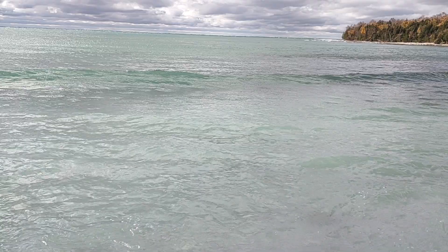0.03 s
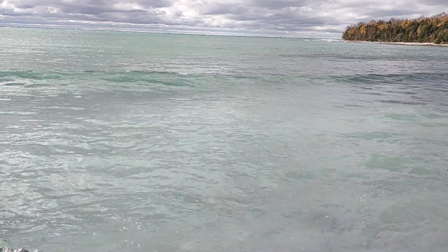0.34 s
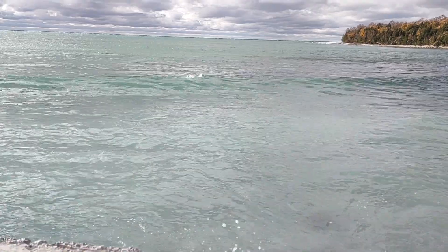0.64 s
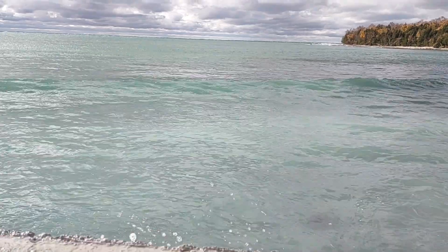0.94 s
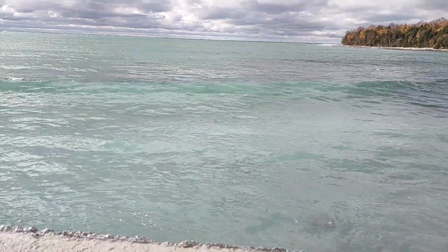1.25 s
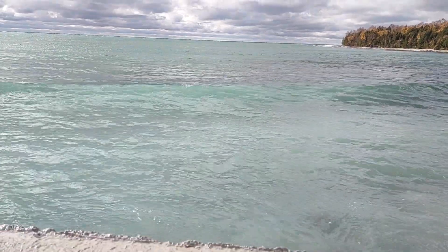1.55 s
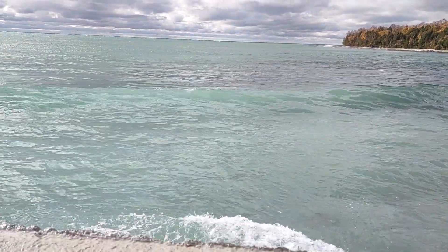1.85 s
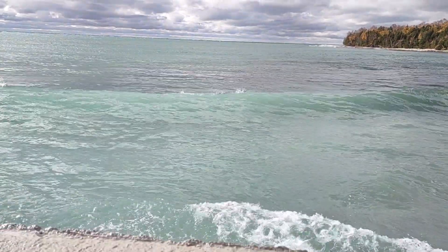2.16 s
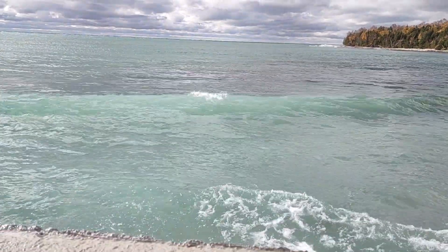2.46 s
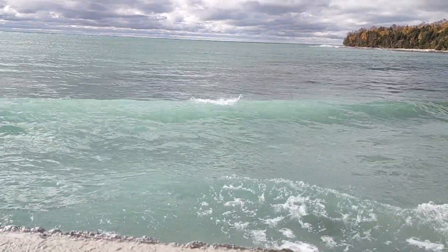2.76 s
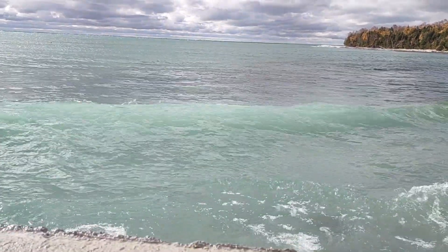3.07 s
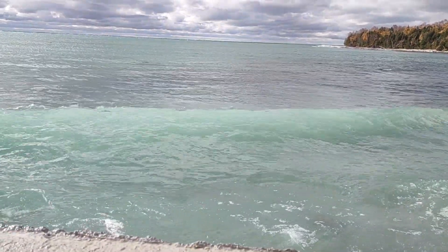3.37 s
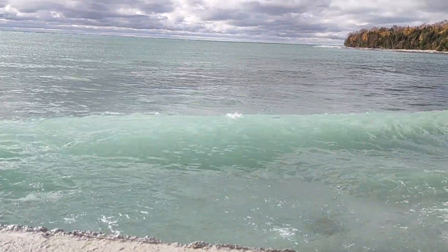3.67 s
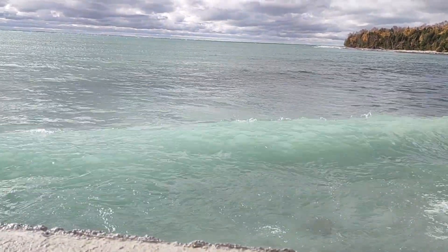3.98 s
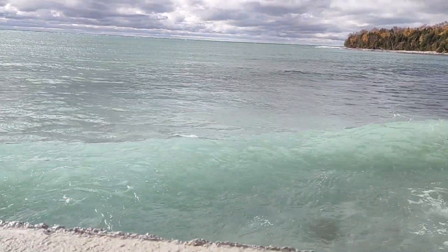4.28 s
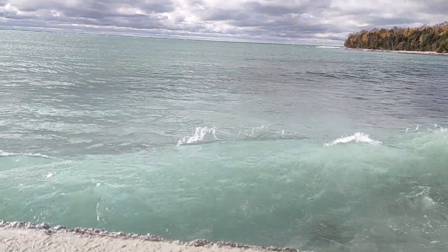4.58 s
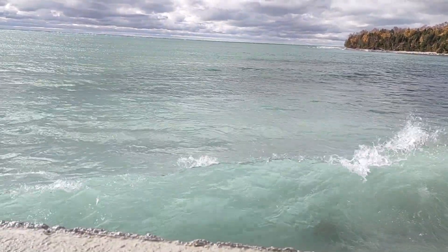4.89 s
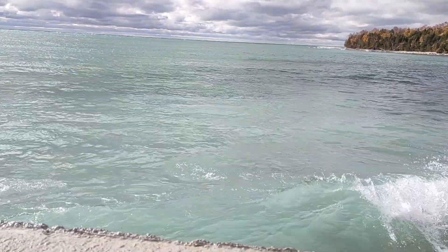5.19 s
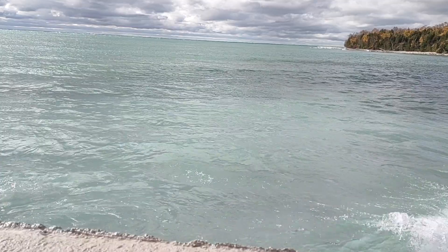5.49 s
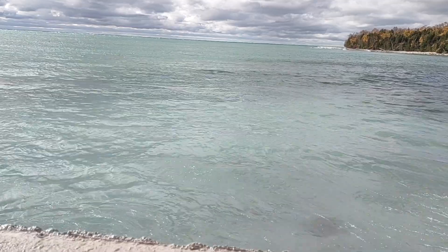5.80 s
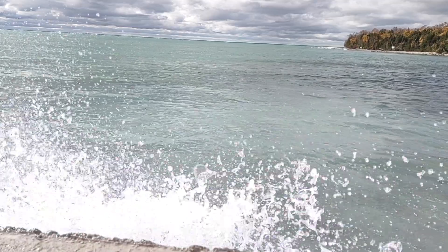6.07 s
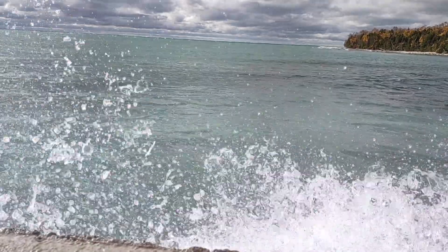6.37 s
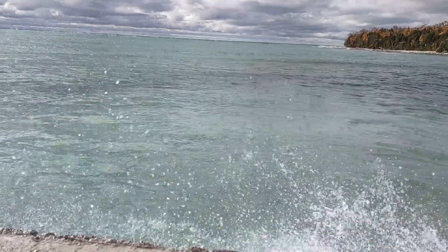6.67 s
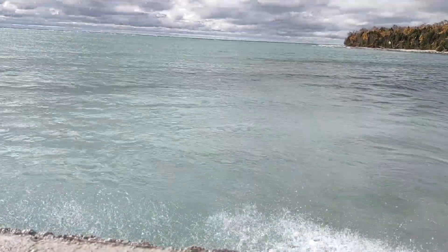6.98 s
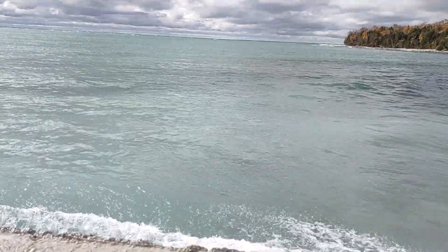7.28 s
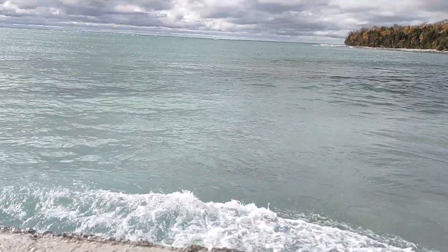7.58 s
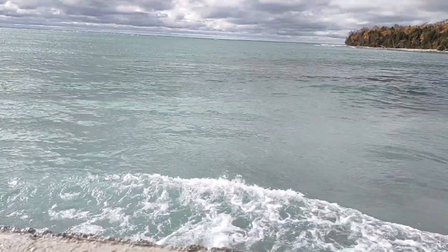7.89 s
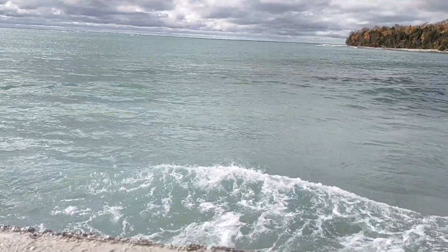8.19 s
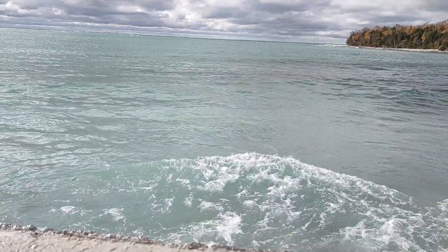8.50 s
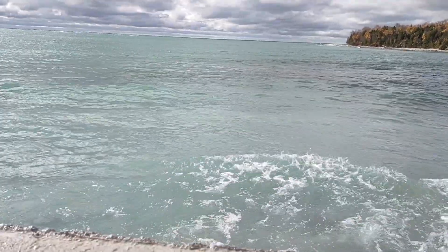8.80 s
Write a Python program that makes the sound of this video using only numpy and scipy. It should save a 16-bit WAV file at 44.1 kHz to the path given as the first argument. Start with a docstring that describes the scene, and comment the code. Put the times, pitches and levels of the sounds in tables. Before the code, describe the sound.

Outdoors at a lakeside wall, close water washes up with soft thumps and a foamy backwash. Uneven gusts rumble and flutter on both sides of the hand-held microphone, strongest around the middle. The next wave builds, thuds into the concrete and breaks loudly, throwing up hissing spray. Afterwards the foam fizzes away, leaving lapping water and the softer rush of a more distant wave.

```python
"""Lake swells run against a concrete edge: one washes up and drains back, the next curls and bursts.
Entrained air resonates, so the water roars, gurgles and thuds; the backwash rushes, foam fizzes,
spray sizzles and drops patter down, while surf churns further along the shore.
The water is heard through the two spaced, resonant ports of a hand-held microphone.
Turbulent gusts buffet each port on its own, with a low rumble and flutter."""
import sys
import numpy as np
from scipy import signal
from scipy.fft import rfft, irfft, next_fast_len
from scipy.io import wavfile
from scipy.ndimage import uniform_filter1d

SR = 44100
rng = np.random.default_rng(int(sys.argv[2]) if len(sys.argv) > 2 else 0)


def generate_wav(signal):
    """Clip the signal to [-1, 1] and save it as 16-bit WAV at the path in sys.argv[1]."""
    frames = np.transpose(np.atleast_2d(signal))
    scaled = np.clip(frames, -1, 1) * 32767
    pcm = np.round(scaled).astype(np.int16)
    wavfile.write(sys.argv[1], SR, pcm)


N = 399105
TIME = np.arange(N) / SR
FFT_SIZE = next_fast_len(N, True)
HZ = np.maximum(np.arange(FFT_SIZE // 2 + 1) * SR / FFT_SIZE, 1)

# Spectra of the water: f/Hz, relative spectral level/dB
ROAR_SPECTRUM = [(40, -50), (90, 1.5), (170, 2.5), (240, 2), (310, 3), (450, 4), (650, -0.5), (850, -9.5),
                 (1050, -8.5), (1400, -15), (1800, -8.5), (2200, -16), (2600, -10.5), (6000, -43)]  # clouds of trapped air
WASH_SPECTRUM = [(300, -7.5), (700, 5), (1050, -8), (1400, 2.5), (1650, 0), (1950, 1), (2280, 0.5),
                 (2550, -10), (2850, -8), (3200, -18), (6000, -36.5), (9000, -49.5), (16000, -56)]  # the running sheet of water
FOAM_SPECTRUM = [(700, -26.5), (1500, -11.5), (2500, -5.5), (3500, 2), (5500, -4), (7000, -9.5),
                 (9000, -25.5), (16000, -54)]
SPRAY_SPECTRUM = [(900, -15), (2000, -15), (5000, 0), (7000, -1), (9600, -4), (11800, -11), (16000, -10)]
SURF_SPECTRUM = [(150, -48), (420, 9), (650, 8), (950, 0.5), (1150, 4), (1450, -15), (3000, -45)]  # churning further along the shore
MIST_SPECTRUM = [(5000, -29), (8000, 4), (11000, -1), (13500, 5), (16000, 0)]  # the finest spray
CAVITY_SPECTRUM = [(150, -2), (240, 12.5), (340, -5.5), (750, -30), (980, -0.5), (1150, -15), (1330, -7),
                   (1770, -5), (2100, -20), (2420, -3.5), (2580, -10), (2780, -5.5), (3300, -50),
                   (6000, -36)]  # the air pocket under the curling crest
SPILL_SPECTRUM = [(300, -10), (700, -5.5), (1000, -12), (1380, 9), (1650, 1), (1900, 1), (2300, -4.5),
                  (2550, -11.5), (3020, -13.5), (3300, -27), (6000, -30), (9000, -45), (16000, -62)]  # the distant spilling crest
# Lapping between surges: t/s, wash/dB, foam/dB, spray/dB, left minus right/dB
LAPPING_LEVELS = [(0, -42, -47, -56, -2), (2.7, -39.5, -93, -60, -0.5), (3.4, -37, -60, -59.5, 1.5),
                  (3.9, -39, -61, -63, -0.5), (4.45, -39.5, -58, -61, -1.5), (5.3, -58, -61, -56, 3),
                  (7.7, -46, -55, -58.5, -0.5), (9.05, -54, -68, -72, -15)]
# Surges at the wall; four rows for the first swell, six for the one that breaks: start/s, rise/s, hold/s,
# foam decay/(dB/s), roar/dB, wash/dB, foam/dB, spray/dB, left minus right/dB
WALL_SURGES = [(0.225, 0.22, .33, 16, -25, -31, -37.5, -54, 1.5),
               (0.797, 0.1, 0.49, 23.5, -27, -27.5, -33.5, -52, 1.5),
               (1.0, 0.19, .02, 19, -43, -31.5, -50, -41, -2),
               (1.513, 0.23, 0.21, 20, -28, -34, -38, -76, 1),
               (4.491, 0.11, 0.059, 58.5, -31, -38.5, -51, -62, -2),
               (4.618, 0.14, 0.26, 30, -31.5, -54, -43, -51.5, -6.5),
               (4.94, 0.42, 0.64, 25.5, -29, -67, -34, -33, -5.5),
               (5.817, 0.49, 0.14, 32.5, -20.5, -29.5, -30, -30, 0.7),
               (6.476, .27, 0.16, 55, -22, -36, -29.5, -30, -1.5),
               (6.85, 0.14, 0.087, 48, -55.5, -57, -33, -34, -4)]
# Churning of the distant surf: t/s, level/dB
SURF_LEVELS = [(0, -66), (4.5, -44), (5.3, -38), (6.3, -26), (7.1, -30.5), (7.8, -38), (9.05, -39)]
# Gusts: start/s, rise/s, hold/s, left port/dB, right port/dB, extra small eddies/dB
WIND_GUSTS = [(.4, 0.12, 0.25, -33, -35, 2), (1.497, 0.76, 0.085, -38.5, -29, -12),
              (2.496, 0.1189, .45, -29, -29, -3), (3.15, .42, .13, -27, -19, 2.5),
              (3.72, .42, 0.34, -15, -18.5, 2.5), (4.999, 0.121, .2, -22.5, -24, 2),
              (5.501, .1, .1, -26, -27, 0.5), (5.75, .5, .1, -22, -23, -1),
              (6.621, .12, 0.092, -18, -23, -1.5), (7.099, .08, .3, -26, -32, -3.5),
              (7.599, 0.18, .25, -38, -45, -6)]
# Spectra of large and small eddies: f/Hz, relative spectral level/dB
RUMBLE_SPECTRUM = [(40, -12), (65, -8.5), (105, 3), (170, -3.5), (260, -19), (400, -24), (800, -63),
                   (2000, -76)]
FLUTTER_SPECTRUM = [(100, -8.5), (170, -1), (250, 4), (350, -6.5), (450, -14.5), (800, -27), (1400, -52),
                    (3000, -79)]
# Air pockets pinched off against the wall: t/s, level/dB, f/Hz
WALL_SLAPS = [(0.338, -17, 205), (0.481, -16, 116), (0.746, -11, 165), (.836, -20, 122),
              (5.844, -11.5, 184), (6.106, -10.5, 150), (6.298, -9, 138.8)]
# Finest spray thrown up close by: start/s, rise/s, hold/s, decay/(dB/s), level/dB
MIST_BURSTS = [(1.1, .13, .02, 104, -53), (6.043, .26, 0.14, 30, -35.5), (6.6, .25, 0.21, 188, -40.5)]
# Single eddies striking a port: t/s, duration/s, level/dB, port (0 left, 1 right), speed/usual speed
EDDY_STRIKES = [(2.19, 0.034, -19.5, 1, .85), (2.28, 0.026, -23.5, 1, .9), (2.617, .028, -7.5, 1, 1.15),
                (2.744, 0.057, -19, 0, .95), (2.807, 0.02, -15.5, 0, .95), (2.916, 0.044, -19.5, 1, .8),
                (3.105, 0.022, -23.5, 0, .9), (3.268, 0.018, -14.5, 1, 1), (3.38, 0.048, -15, 1, 1.25),
                (3.59, 0.086, -12, 0, 1.3), (3.718, 0.063, -19, 0, 1.1), (3.884, .03, -13, 1, 1),
                (3.979, 0.027, -12, 1, 1.1), (4.366, 0.091, -11, 0, 1.1), (4.435, 0.052, -9.5, 1, 1.2),
                (4.629, 0.18, -16, 1, 1.3), (4.636, 0.096, -11, 0, 1.5), (4.689, 0.0484, -8.5, 0, 2),
                (4.91, 0.092, -10.5, 0, 1.1), (5.033, 0.056, -11.5, 0, 1.1), (5.115, 0.063, -14.5, 0, 1.3),
                (5.477, .08, -7.5, 0, 1.8), (5.597, 0.064, -15, 0, 1.2), (5.855, 0.043, -17.5, 1, 1.4),
                (6.691, 0.034, -15, 1, .9), (6.798, 0.066, -11, 0, .9), (6.847, 0.031, -12.5, 0, .9),
                (6.899, 0.069, -12, 0, 1), (7.047, 0.025, -16.5, 1, .9), (7.159, .037, -17, 0, .9),
                (7.22, .04, -20.5, 0, .9), (7.263, .035, -12.5, 1, 1), (7.284, 0.0185, -8, 1, 1.4),
                (7.498, 0.038, -17, 0, 1), (7.535, .028, -20.5, 1, 1), (7.836, 0.034, -29.5, 0, .9),
                (7.895, 0.035, -30.5, 1, .9), (8.63, 0.081, -28.5, 1, .9)]
# Drops landing close by: t/s, level/dB, left minus right/dB, f/Hz
DROP_IMPACTS = [(2.551,-57,-4,4995), (3.807,-61.5,-6,5520), (4.108,-54,-5,5430), (4.133,-47,-4,5930),
                (4.313,-44,-6,2964), (4.434,-43,-5,5320), (4.589,-38.5,-3.5,5020), (4.833,-39.5,-13,4150),
                (5.309,-26.5,-9,5480), (7.579,-51,-4,13960), (7.749,-45,0,4227)]
# Shore sound across the two ports: f/Hz, coherence (0 to 1), phase lead of the right port/rad
PORT_COHERENCE = [(198, 0.99, .05), (435, 0.78, 0.79), (696, 0.82, 1.14), (863, 0.58, 3.25),
                  (1420, 0.65, 3.1), (1654, 0.32, 3.6), (2030, 0.37, 7.5), (2326, 0.42, 5.8),
                  (3080, 0, 13.4), (3670, 0.13, 12.2), (5400, 0, 16.8)]
# Resonances of the ports: f/Hz, left gain/dB, right gain/dB
PORT_RESPONSE = [(203, 1.5, 1), (530, -4, -3.5), (1100, 3.5, 3), (1310, -1, -2), (1970, -0.5, -2),
                 (2390, 1, -1.5), (3040, -6.5, 4.5), (4110, 1, 5.5), (5740, -1, 9), (6980, -1.5, -2),
                 (9050, -8.5, -1.5), (11500, -2.5, -2), (15500, -1.5, 0)]


def from_db(db):
    """Amplitude ratio of a level in decibels."""
    return np.exp(np.asarray(db) * (np.log(10) / 20))


def unit_rms(x):
    """Normalisation to unit mean square."""
    return x / np.sqrt(np.mean(x ** 2) + 1e-20)


def over_time(rows):
    """Linear interpolation of each column to every sample."""
    times, *columns = np.transpose(rows)
    return [np.interp(TIME, times, column) for column in columns]


def over_frequency(rows):
    """Interpolation of each column to every frequency, on an octave scale."""
    hz, *columns = np.transpose(rows)
    return np.array([np.interp(np.log2(HZ), np.log2(hz), column) for column in columns])


def filtered(x, response):
    """Linear filtering: the spectrum is multiplied by a response tabulated in decibels."""
    return irfft(rfft(x, FFT_SIZE) * from_db(over_frequency(response)), FFT_SIZE)[:, :N]


def panned(pan_db):
    """Left and right gains: a level difference gives direction."""
    return from_db(np.array([[.5], [-.5]]) * pan_db)


def drift(rate_hz):
    """Slow random modulation: low-passed noise of unit spread."""
    step, settling = 40, 2000
    pole = np.exp(-2 * np.pi * rate_hz * step / SR)
    noise = rng.standard_normal(N // step + settling + 2)
    slow = signal.lfilter([1], [1, -2 * pole, pole * pole], noise)[settling:]
    return np.interp(np.arange(N) / step, np.arange(len(slow)), unit_rms(slow))


def envelope(start_s, rise_s, hold_s, fall_db_per_s):
    """One push of water or air: linear growth, a plateau, then exponential decay."""
    age = TIME - start_s
    dying_s = np.maximum(age - rise_s - hold_s, 0)
    return np.clip(age / rise_s, 0, 1) * from_db(-fall_db_per_s * dying_s)


def pops(per_s, spread_db):
    """A Poisson process: impulses of random size, each with its own strength in either channel."""
    chance, size, left, right = rng.random((4, N), dtype=np.float32)
    born, out = chance < per_s / SR, np.zeros((2, N), np.float32)
    height = from_db(-spread_db * np.log(size[born] + .01))
    out[:, born] = height * (np.array([left[born], right[born]]) - .5)
    return out


def water_noise(spectrum, per_s, spread_db, waver_db, waver_hz):
    """Shot noise: a wavering crowd of tiny bursts, partly coherent between the spaced ports."""
    coherence, lead = over_frequency(PORT_COHERENCE).astype(np.float32)
    coherence = np.clip(coherence, 0, 1)
    left, independent = rfft(pops(per_s, spread_db), FFT_SIZE)
    right = coherence * np.exp(1j * lead) * left + np.sqrt(1 - coherence ** 2) * independent
    colour = from_db(over_frequency(spectrum)).astype(np.float32)
    crowd = irfft(np.array([left, right]) * colour, FFT_SIZE)[:, :N]
    return unit_rms(crowd * from_db(waver_db * drift(waver_hz)))


def bubbles(low_hz, high_hz, cycles, glide, spread_db, count):
    """Bubble resonance: each rings down and climbs in pitch near the surface; the far port lags."""
    out, port_lag = np.zeros((2, N + SR)), SR // 2000
    for when, size, strength, side in rng.random((count, 4)):
        hz = low_hz * (high_hz / low_hz) ** size
        start, near = int(when * N), int(side > .5)
        life = cycles / hz
        age = TIME[:int(life * SR)]
        height = from_db(-spread_db * np.log(strength + .01) - 60 * age / life)
        ring = height * np.sin(2 * np.pi * hz * age * (1 + glide * age / life))
        out[near, start:start + len(age)] += ring
        out[1 - near, start + port_lag:start + port_lag + len(age)] += ring
    return unit_rms(out[:, :N])


def surge_gains(lapping_roar_db=-39.5):
    """Incoherent sources add in power: each surge joins the lapping in roar, wash, foam and spray."""
    *lapping_db, lapping_pan_db = over_time(LAPPING_LEVELS)
    wash, foam, spray = ((panned(lapping_pan_db) * from_db(db)) ** 2 for db in lapping_db)
    roar = from_db(lapping_roar_db) ** 2
    for start, rise, hold, fall, roar_db, wash_db, foam_db, spray_db, pan_db in WALL_SURGES:
        side = panned(pan_db)
        # roar and wash outlast the foam; spray dies soonest
        roar += (from_db(roar_db) * envelope(start, rise, hold, fall * .6)) ** 2
        wash += (side * from_db(wash_db) * envelope(start, rise, hold, fall * .6)) ** 2
        foam += (side * from_db(foam_db) * envelope(start, rise, hold, fall)) ** 2
        spray += (side * from_db(spray_db) * envelope(start, rise, hold, fall * 1.74)) ** 2
    return [np.sqrt(power) for power in (roar, wash, foam, spray)]


def waves(bubble_db=-14):
    """Air entrainment: bubble clouds roar, the wash rushes, foam and spray crackle, lone bubbles ring."""
    roar_gain, wash_gain, foam_gain, spray_gain = surge_gains()
    roar = water_noise(ROAR_SPECTRUM, per_s=7000, spread_db=2, waver_db=1.45, waver_hz=6.1)
    wash = water_noise(WASH_SPECTRUM, per_s=9000, spread_db=2, waver_db=.78, waver_hz=9.6)
    foam = water_noise(FOAM_SPECTRUM, per_s=20000, spread_db=2, waver_db=1.05, waver_hz=10.5)
    spray = water_noise(SPRAY_SPECTRUM, per_s=18000, spread_db=1, waver_db=.8, waver_hz=29)
    gurgle = from_db(bubble_db) * bubbles(260, 900, cycles=32, glide=.15, spread_db=3, count=600)
    trickle = from_db(bubble_db) * bubbles(900, 2600, cycles=36, glide=.15, spread_db=3.5, count=1500)
    fizz = from_db(bubble_db) * bubbles(2600, 6500, cycles=40, glide=.08, spread_db=4, count=2000)
    return (roar_gain * (roar + gurgle) + wash_gain * (wash + trickle)
            + foam_gain * (foam + fizz) + spray_gain * spray)


def far_surf(gulps_db=-9):
    """Water churning along the shore: shot noise, with the gulps of resonating bubbles."""
    surf_db, = over_time(SURF_LEVELS)
    churn = water_noise(SURF_SPECTRUM, per_s=6000, spread_db=2, waver_db=1.5, waver_hz=17)
    gulps = from_db(gulps_db) * bubbles(350, 1000, cycles=45, glide=.1, spread_db=3.5, count=220)
    return from_db(surf_db) * (churn + gulps)


def gusts(breeze_db=-49, fall_db_per_s=75):
    """Gusts add in power to a breeze, giving the pressure of large and small eddies at each port."""
    large = small = from_db(breeze_db) ** 2
    for start, rise, hold, left_db, right_db, small_db in WIND_GUSTS:
        gust = from_db([[left_db], [right_db]]) * envelope(start, rise, hold, fall_db_per_s)
        large = large + gust ** 2
        small = small + (gust * from_db(small_db)) ** 2
    return np.sqrt([large, small])


def eddies(spectrum, speed, steadiness):
    """Frozen turbulence: a fixed pattern is carried past each port, so frequency scales with speed."""
    swirl = unit_rms(filtered(rng.standard_normal((2, N)), spectrum))
    local_power = uniform_filter1d(swirl ** 2, size=1200, axis=1)
    swirl = unit_rms(swirl / (local_power + 1e-9) ** (steadiness / 2))
    travelled = np.cumsum(speed, axis=1) % (N - 1)
    return np.array([np.interp(path, np.arange(N), port) for path, port in zip(travelled, swirl)])


def wind(flutter_db=-9, flutter_exponent=1.006, usual_db=-20, speed_exponent=.14):
    """Turbulent pressure on the ports rumbles and flutters; stronger flow is faster, hence brighter."""
    waver_db = .9 * np.array([drift(18), drift(18)])
    flow, small_eddies = gusts() * from_db(waver_db)
    blows, blow_speed = buffets()
    pressure = np.hypot(flow, blows)
    flow_speed = np.maximum(flow / from_db(usual_db), .2) ** speed_exponent
    speed = (flow_speed * flow ** 2 + blow_speed * blows ** 2) / pressure ** 2  # power-weighted mean
    rumble = pressure * eddies(RUMBLE_SPECTRUM, speed, steadiness=.55)
    flutter_gain = from_db(flutter_db) * np.hypot(small_eddies, blows) ** flutter_exponent
    return rumble + flutter_gain * eddies(FLUTTER_SPECTRUM, speed, steadiness=.45)


def slaps(t60_s=.066, rise_s=.0014):
    """Damped oscillation of air squeezed against the wall: a dull thud, alike at both ports."""
    out, age = np.zeros(N), TIME[:SR // 4]
    for onset_s, level_db, hz in WALL_SLAPS:
        start = int(onset_s * SR)
        height = from_db(level_db - 60 * age / t60_s) * (1 - np.exp(-age / rise_s))
        out[start:start + len(age)] += height * np.sin(2 * np.pi * (hz * age + rng.random()))
    return out


def mist():
    """Shot noise of the finest droplets: a top-octave sizzle where a wave strikes the wall."""
    sizzle = water_noise(MIST_SPECTRUM, per_s=20000, spread_db=2.2, waver_db=.6, waver_hz=30)
    power = sum((from_db(db) * envelope(*timing)) ** 2 for *timing, db in MIST_BURSTS)
    return np.sqrt(power) * sizzle


def buffets(roughness_db=.8):
    """Convection of single eddies past a port: the pressure and speed of each brief, shaking pulse."""
    power, weighted_speed = np.zeros((2, 2, N))
    for centre_s, length_s, level_db, port, speed in EDDY_STRIKES:
        passing = np.abs(TIME - centre_s) < length_s / 2
        pulse = (from_db(level_db) * np.cos(np.pi * (TIME[passing] - centre_s) / length_s)) ** 2
        power[int(port), passing] += pulse
        weighted_speed[int(port), passing] += pulse * speed
    return np.sqrt(power) * from_db(roughness_db * drift(65)), weighted_speed / (power + 1e-18)


def drops(t60_s=.018):
    """Impact transients: each drop lands with a plink of damped noise around its own pitch."""
    out, age = np.zeros((2, N)), TIME[:SR // 20]
    for onset_s, level_db, pan_db, hz in DROP_IMPACTS:
        band = signal.butter(2, [hz * .8, min(hz * 1.15, 19000)], "band", fs=SR, output="sos")
        plink = unit_rms(signal.sosfilt(band, rng.standard_normal((2, len(age)))))
        start = int(onset_s * SR)
        out[:, start:start + len(age)] += plink * panned(pan_db) * from_db(level_db - 60 * age / t60_s)
    return out


def crest_cavity(level_db=-27):
    """Cavity resonance: air under the curling crest booms like a tube, then fades as it collapses."""
    gain = from_db(level_db) * envelope(start_s=4.42, rise_s=1.49, hold_s=.9, fall_db_per_s=22)
    return gain * water_noise(CAVITY_SPECTRUM, per_s=6000, spread_db=4, waver_db=3, waver_hz=9.8)


def far_spill(level_db=-32):
    """Shot noise of a crest spilling further along the shore: a rattling rush."""
    rush = water_noise(SPILL_SPECTRUM, per_s=9000, spread_db=-2, waver_db=.4, waver_hz=11.5)
    gain = from_db(level_db) * envelope(start_s=7.72, rise_s=1, hold_s=.5, fall_db_per_s=10)
    return gain * rush * panned(pan_db=2.2)


def scene():
    """Superposition: port resonances colour the lake's sound, while wind acts on the ports directly."""
    lake = waves() + crest_cavity() + mist() + far_surf() + far_spill() + slaps() + drops()
    return filtered(lake, PORT_RESPONSE) + wind()


def record(dry, low_cut_hz=52, high_cut_hz=15800, opens_s=.235):
    """Band limiting and soft saturation in the microphone, which opens after a moment."""
    x = signal.sosfilt(signal.butter(4, low_cut_hz, "high", fs=SR, output="sos"), dry)
    x = 1.254 * np.tanh(x / 1.294)
    x *= np.clip((TIME - opens_s) / .0051, 0, 1)
    return signal.sosfilt(signal.ellip(12, .1, 90, high_cut_hz, fs=SR, output="sos"), x)


dry = scene()
out = record(dry)
generate_wav(out)
```